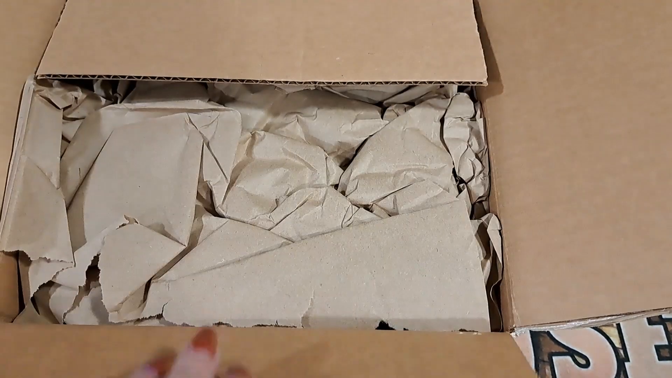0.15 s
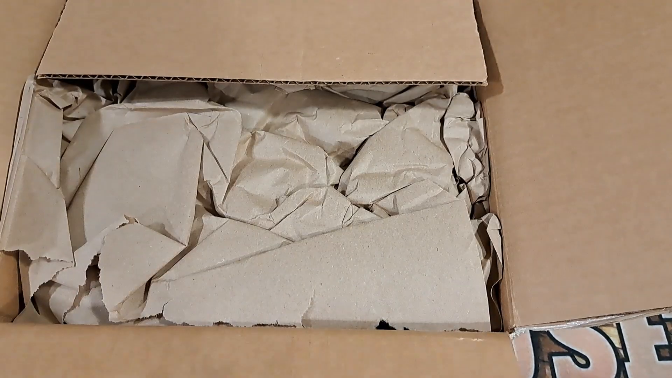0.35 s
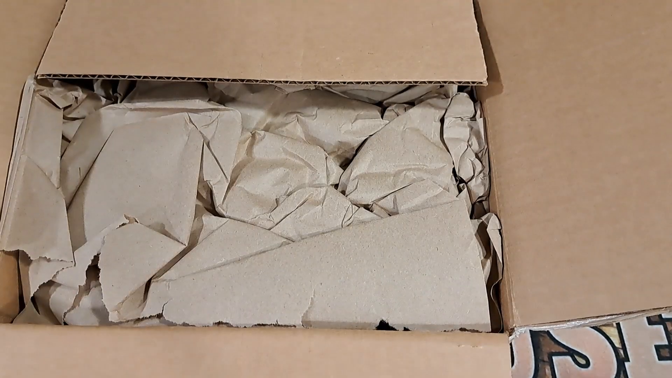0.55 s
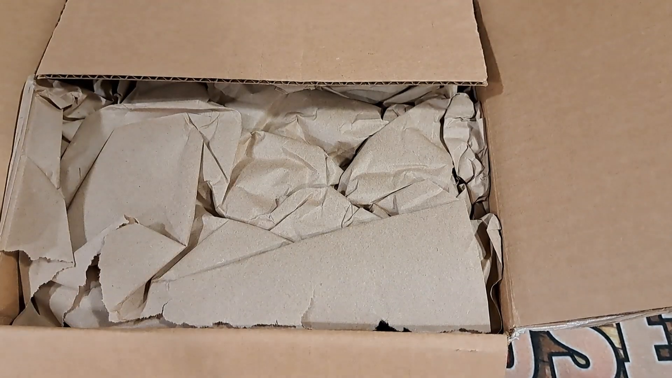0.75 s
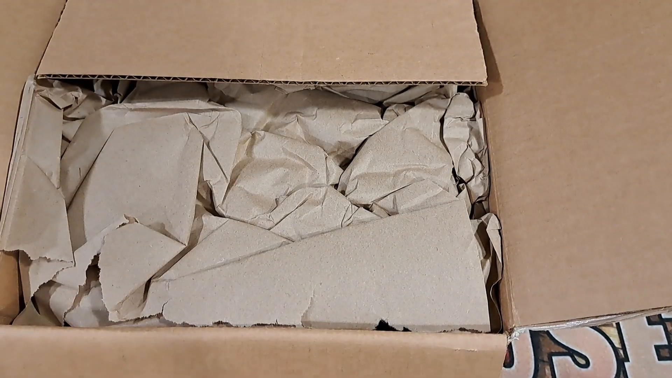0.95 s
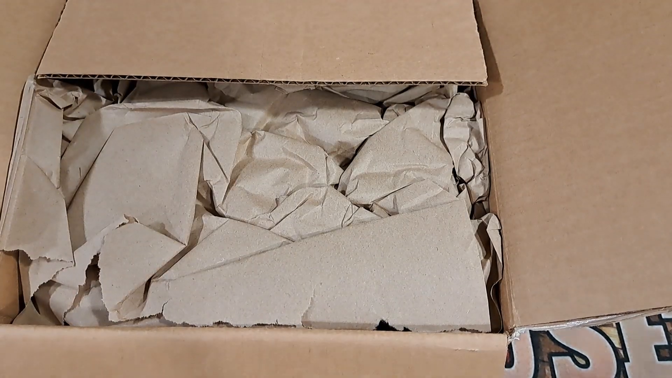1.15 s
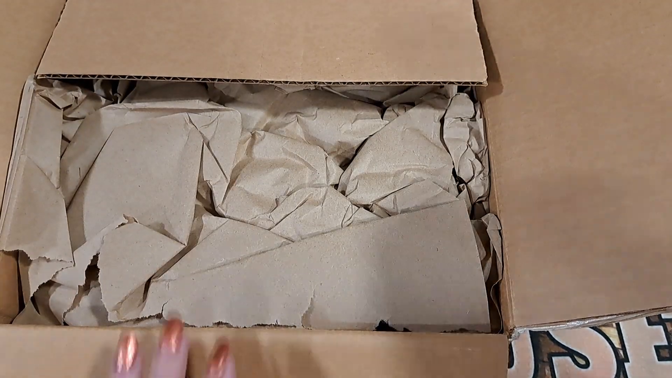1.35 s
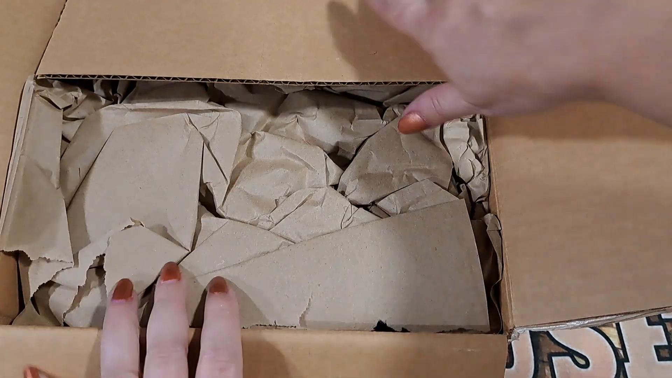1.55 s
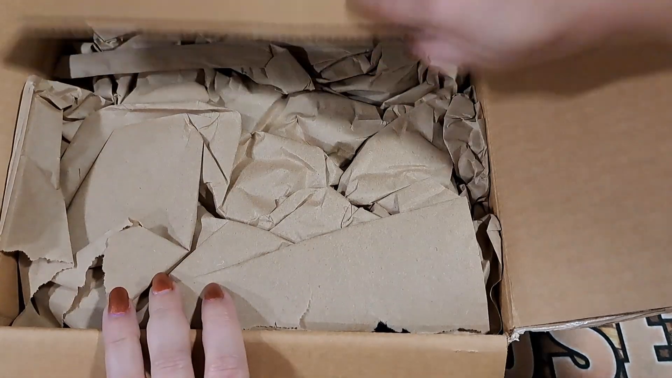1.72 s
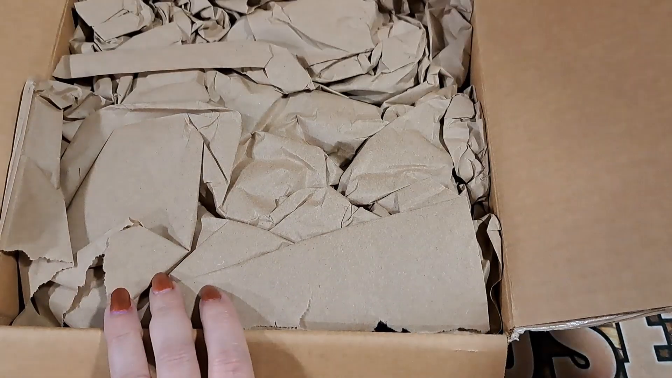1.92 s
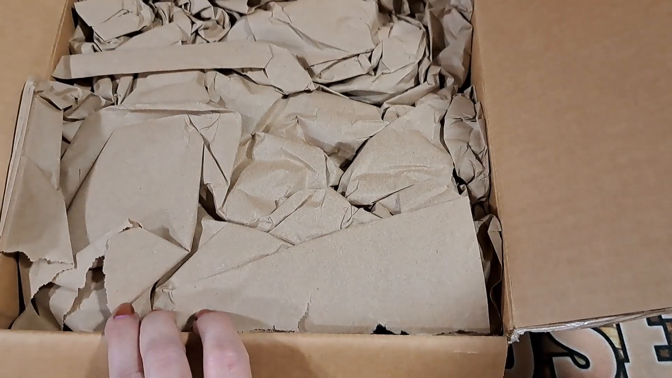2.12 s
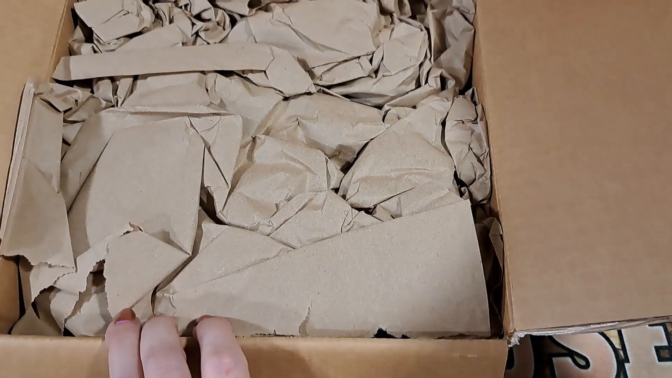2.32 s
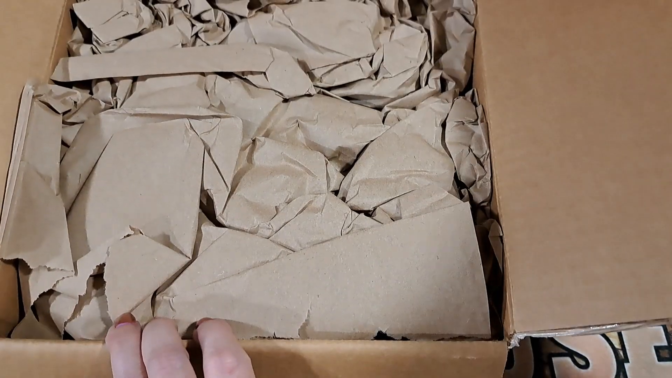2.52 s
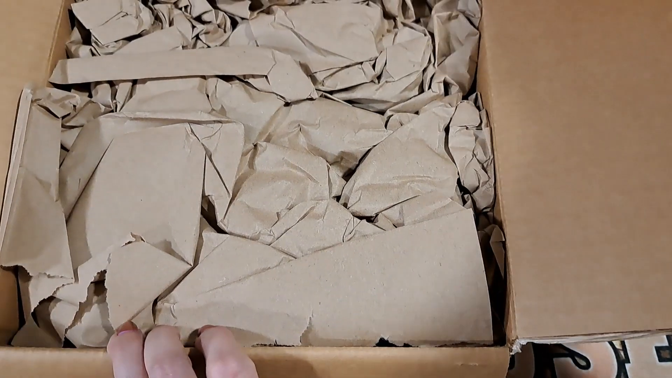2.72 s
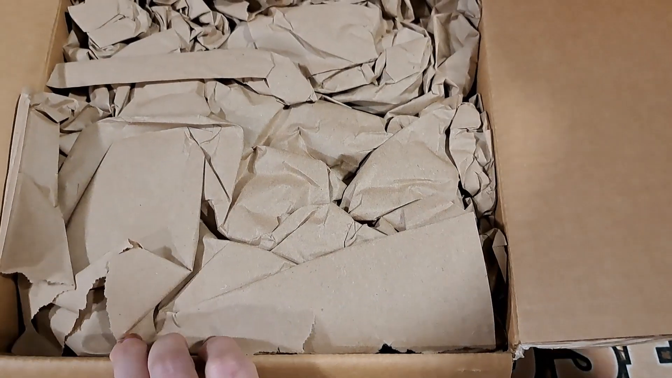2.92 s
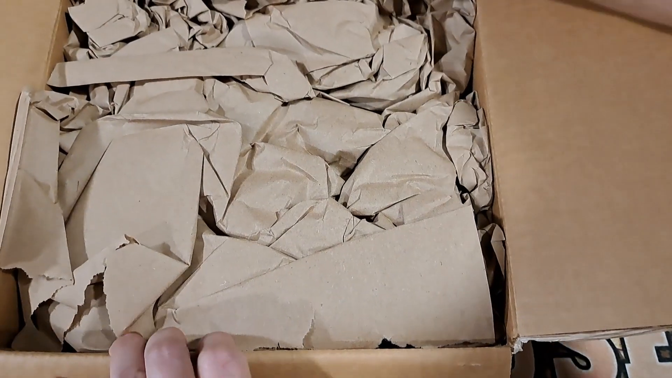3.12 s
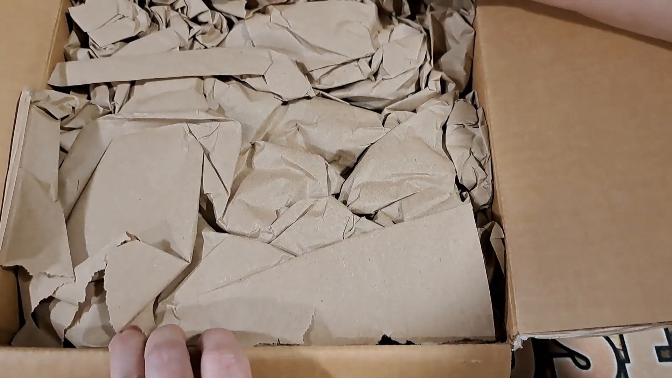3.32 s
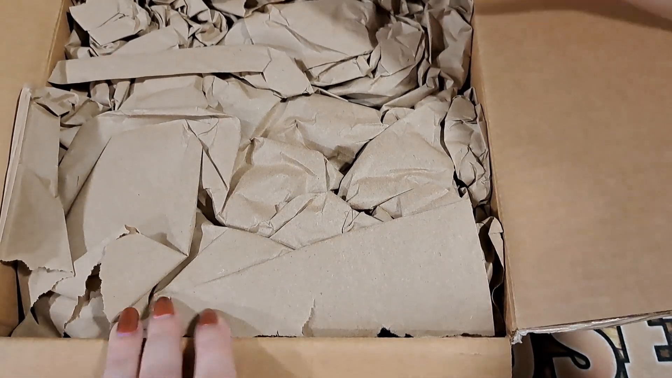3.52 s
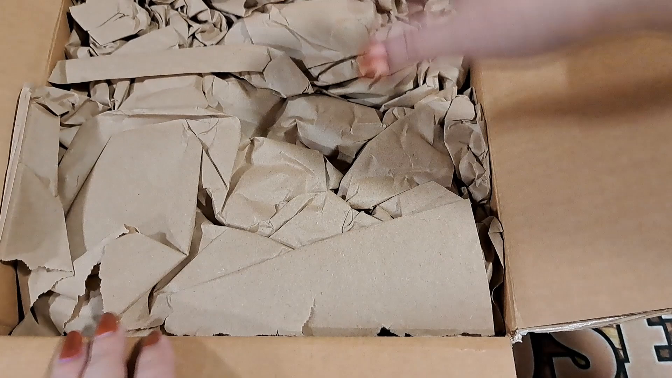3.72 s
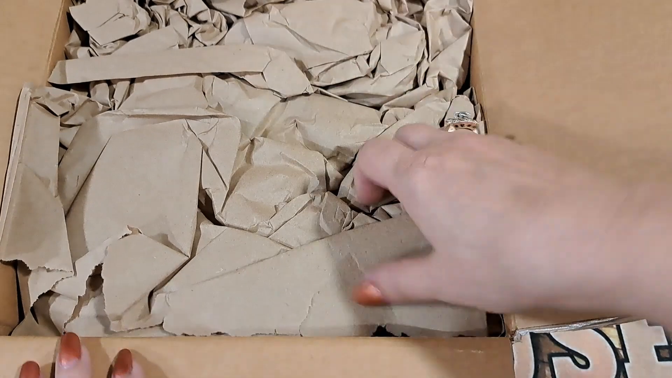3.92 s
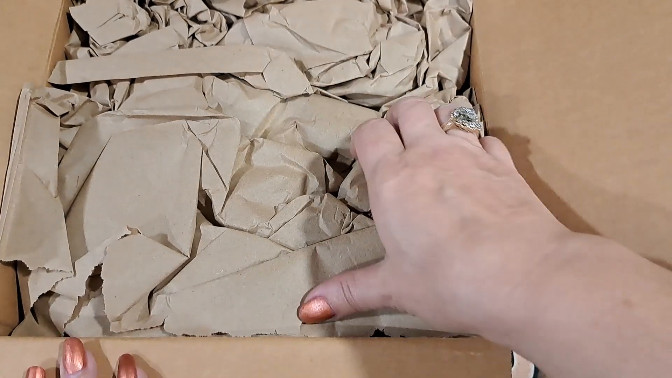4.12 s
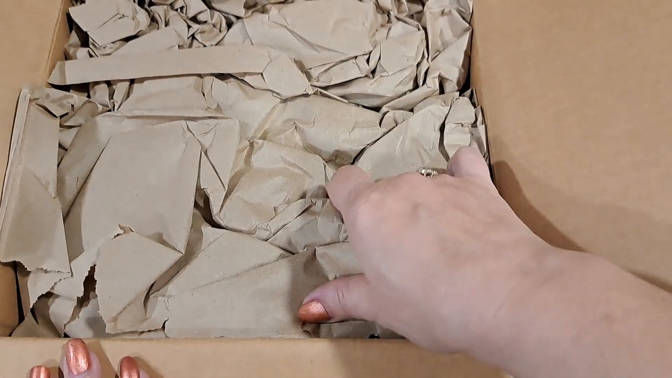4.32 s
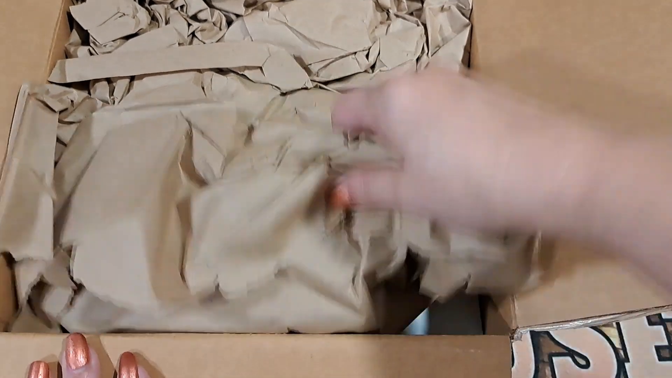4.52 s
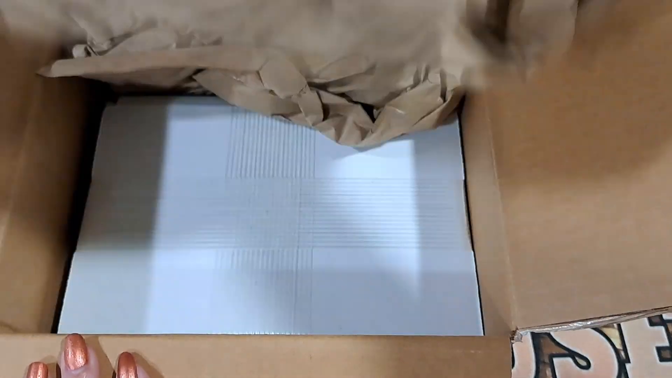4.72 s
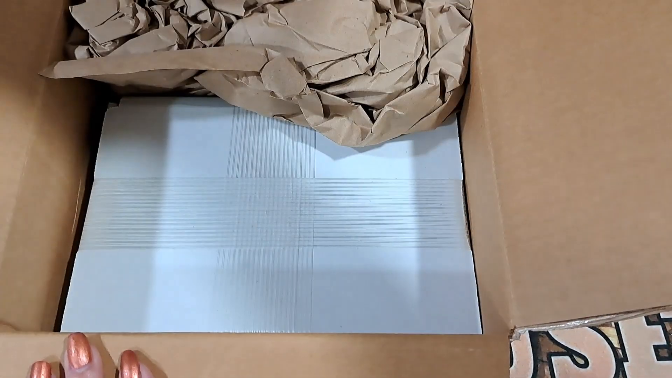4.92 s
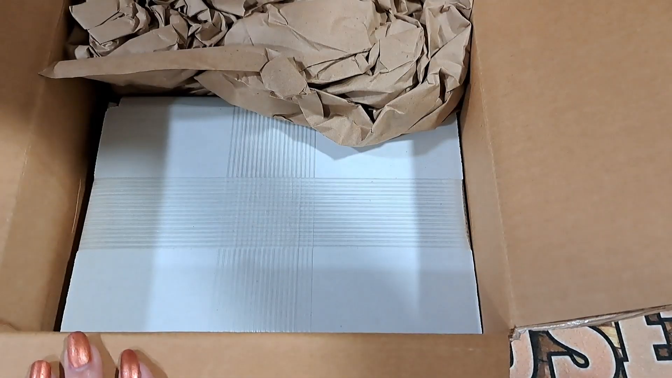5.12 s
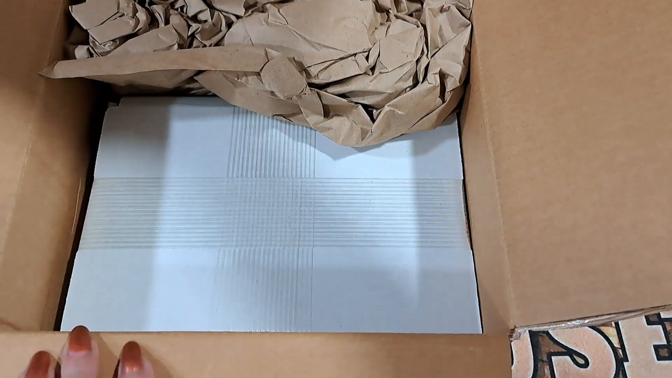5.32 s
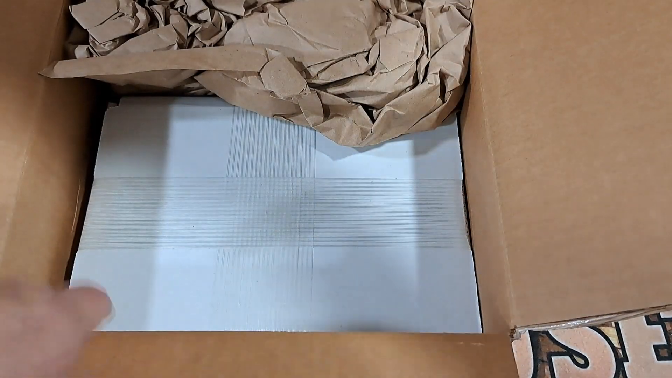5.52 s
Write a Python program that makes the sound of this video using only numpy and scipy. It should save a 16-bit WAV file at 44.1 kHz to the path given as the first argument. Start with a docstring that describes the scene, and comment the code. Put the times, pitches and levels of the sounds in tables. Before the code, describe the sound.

Cardboard box flaps scrape and thump open with tiny jewellery clinks, then crumpled packing paper is dragged out in loud, crackling bursts.

```python
"""Close to a phone in a small, dry room, hands fold back the flaps of a cardboard box: light scrapes and
scuffs at first, while metal jewellery clinks on the moving arm. Then the far flap swings free, its modes
drum under random slips over a coloured crackle, and it ends in a squawk of chatter as the box rocks.
Next, crumpled packing paper is dragged out: crowds of tiny filtered bursts crackle, snap and flop. Last come
faint strokes and scuffs. Near echoes from the box, a short room tail and quiet air lie around it all."""
import sys
import numpy as np
from scipy import signal
from scipy.fft import rfft, irfft, next_fast_len
from scipy.io import wavfile
from scipy.ndimage import uniform_filter1d

SR = 44100
rng = np.random.default_rng(int(sys.argv[2]) if len(sys.argv) > 2 else 0)


def wav_out(sig):
    """Save sig, one row per channel (or a flat mono array), as 16-bit PCM at SR to the path in sys.argv[1]."""
    wavfile.write(sys.argv[1], SR, np.round(np.clip(np.atleast_2d(sig).T, -1, 1) * 32767).astype(np.int16))


N = 249341
T = np.arange(N) / SR  # seconds

# Event and movement levels are relative: each layer has its own gain. Positive left_right_db is louder left.
# the loudest creases and edges that snap: start_s, pop_db, pop_hz, crack_db, left_right_db
SNAPS = [(0.0617, -29.5, 890, -29, 3), (.2507, -62, 4390, -29.5, 3), (0.285, -47.5, 1670, -30, 9.5),
         (0.313, -52, 4480, -30.5, 0), (.465, -49.5, 4290, -42, -3), (.6244, -67, 4390, -42, 7),
         (1.0028, -73, 3270, -43, -1), (1.3767, -29, 816, -46, -4), (1.72, -33.5, 920, -20, -6),
         (1.7514, -19.5, 3180, -16, -5.5), (1.768, -19.5, 4440, -20, -9), (1.8105, -12.5, 1920, -21, 0),
         (1.9614, -27, 3650, -19, -4), (2.11, -26, 3520, -20, -1), (2.1876, -54, 4160, -25.5, -16),
         (2.2032, -30, 4090, -30, -5), (2.2163, -39, 4180, -31, -16.5), (2.383, -17.5, 2260, -11.5, -5),
         (3.2366, -53, 4480, -28, -17.5), (3.5485, -37, 4195, -23, 1.5), (3.7704, -52.5, 3340, -38, -4),
         (3.9517, -28.5, 3420, -23.5, 3), (3.9734, -27, 2030, -22, -5.5), (4.066, -23.5, 3190, -34.5, -3),
         (4.088, -25, 1870, -34.5, 2.5), (4.1269, -22, 2520, -24, -6.5), (4.133, -21, 2000, -16.5, -5),
         (4.1855, -28.5, 4470, -20, -4.5), (4.2144, -23, 4460, -16.5, -10), (4.2735, -8, 2136, -24, -0.5),
         (4.2948, -31, 2280, -13.5, -1.5), (4.3913, -16.5, 2100, -15, -4), (4.4115, -16.5, 2540, -9.5, 1),
         (4.489, -34, 4250, -6, 7.5), (4.5388, -21, 4200, -7, 0.5), (4.68, -16.5, 4390, -10, -8),
         (4.876, -24, 2580, -15, -10), (4.8835, -28.5, 2930, -15.5, 6), (5.1322, -30, 2680, -30.5, -2),
         (5.3366, -39, 2150, -41, 1), (5.5021, -33.5, 2750, -45.5, 0)]
# dull knocks on the box: start_s, level_db, pitch_hz
KNOCKS = [(0.559, -51, 149), (.615, -50, 178), (.905, -53, 423), (1.376, -26, 305), (1.469, -31, 399),
          (1.924, -30, 329), (2.004, -20.5, 265), (2.058, -24.5, 313), (2.28, -30, 520), (2.333, -26, 409),
          (2.387, -7, 390), (2.402, -23.5, 104), (2.882, -25, 380), (3.018, -17.5, 380),
          (3.685, -49.5, 480), (4.27, -15.5, 625), (4.546, -23.5, 245), (4.602, -16, 344), (4.68, -13, 344),
          (4.707, -13, 344), (4.719, -17.5, 400), (4.874, -25, 446), (5.465, -50, 160)]
# the clearest clinks of the jewellery: start_s, level_db, piece (index)
CLINKS = [(.13, -38, 2), (.357, -39, 1), (.42, -44, 2), (.4519, -44, 2), (.8216, -57, 1), (1.0633, -42, 2),
          (1.096, -28.5, 2), (1.2255, -49, 2), (1.325, -43, 2), (1.495, -32, 2), (1.5388, -30, 1),
          (1.627, -29, 1), (1.747, -24, 2), (1.802, -25, 2), (1.887, -33, 2), (1.905, -16.5, 0),
          (1.984, -37, 1), (2.008, -28.5, 0), (2.027, -28.5, 2), (2.309, -32, 0), (2.792, -41, 2),
          (2.8525, -43.5, 2), (3.25, -34, 2), (3.4169, -28, 0), (3.443, -41, 2), (3.615, -41, 2),
          (3.685, -37.5, 0), (3.686, -36.5, 2), (3.716, -42, 2), (4.027, -32.5, 0)]

# modes of each piece of jewellery: nominal pitch_hz, nominal level_db, t60_s
PIECE_MODES = [
    [(7385, 0, .045), (7420, -23, .25), (10850, -18, .1), (12060, -15, .1)],
    [(5680, -6, .11), (9320, 0, .07), (12830, -9, .05), (15170, -15, .06)],
    [(12710, 0, .045), (12860, -14, .12), (13640, -10, .045), (11130, -22, .12), (12350, -11, .04)],
]
# modes of the cardboard panels: pitch_hz, level_db, t60_s
PANEL_MODES = [(60.6, -12.5, 0.15), (143, -5, .07), (218, -4.5, 0.062), (321, 0, 0.042), (376, -2, 0.019),
               (547.5, 3.5, 0.028), (685, 0, 0.029)]
# modes of the far flap: pitch_hz, level_db, t60_s
FAR_FLAP_MODES = [(341.5, -4, 0.093), (416, 1.5, .045), (480, -5, 0.071), (1010, -26.5, 0.09)]
# modes of the near flap, damped by the fingers: pitch_hz, level_db, t60_s
NEAR_FLAP_MODES = [(520, -1, 0.03), (679, 3.5, 0.031), (822, -0.5, 0.031), (1245, -4.5, 0.012),
                   (1680, -4, 0.011), (2015, -4.5, .016), (2800, -10, 0.012)]

# spectrum of rubbed cardboard: frequency_hz, level_db
CARD_COLOUR = [(290, -27), (500, 7), (750, -12), (919, -10.5), (1140, -12), (1640, -15.5), (2160, -17.5),
               (2810, -21), (3060, -21), (3590, -22), (5310, -18), (6060, -18), (11600, -12),
               (15100, -14.5), (16000, -32)]
# spectrum of handled paper: frequency_hz, level_db
PAPER_COLOUR = [(24, -40), (40, -2), (231, 2.5), (337, 1.5), (630, -4.5), (697, -3.5), (751, -4.5),
                (965, -3.5), (1090, -6), (1550, -4), (2260, -8), (4680, -17), (5870, -21), (11600, -21.5),
                (16000, -20.5)]
# spectrum of the room's quiet air: frequency_hz, level_db
AIR_COLOUR = [(18, -28.5), (30, -0.5), (295, -10), (632, -16), (702, -10), (988, -24), (3870, -26.5),
              (7870, -19), (16000, -22.5)]
# spectrum of the chatter's hiss: frequency_hz, level_db
CHATTER_COLOUR = [(1500, -8.5), (3500, -13), (5000, -8.0), (7800, 3.5), (9000, -3.0), (11500, 2.5), (14000, -9.5)]
# spectrum of the rocking rumble: frequency_hz, level_db
ROCK_COLOUR = [(55, 3.5), (70, 4.5), (95, -2.5), (200, -11.5)]
# spectrum of the stray ticks: frequency_hz, level_db
TICK_COLOUR = [(2000, 1.0), (16000, -3.5)]

# how much the two microphones differ: frequency_hz, side_against_mid_db
WIDTH = [(40, -4.5), (70, -6), (130, -12), (300, -17.5), (600, -6.5), (1200, -3.5), (2400, 0.5),
         (5000, 0.5), (16000, 0)]
# the room's decay: frequency_hz, t60_s
ROOM_DECAY = [(100, 0.39), (500, 0.24), (3000, 0.25), (8000, 0.22), (16000, 0.11)]
# echoes from the walls of the box: delay_s, level_db
BOX_ECHOES = [(.0011, -29.5), (.0021, -22), (.0047, -17)]
# where the hands work on the box: time_s, left_right_db
HANDS_SIDE = [(0.7, 2.5), (1.3, 2.5), (1.7, 0), (2.5, -0.5), (3.5, -1), (5.5, 1)]
# how freely the far flap swings while it is rubbed: time_s, share of the drumming's power (0-1)
FLAP_FREE = [(2.25, 0.2), (2.45, 0.97), (2.78, 0.91), (3.16, 0.77), (3.25, 0.14)]

# Each movement builds up before hold_start_s and dies away after the hold.
# strokes of cardboard on cardboard:
# hold_start_s, hold_s, scrape_db, drumming_against_scrape_db, hiss_against_scrape_db
STROKES = [(0, 0.024, -52, -1.5, 1.5), (.09, 0.017, -61, -2, 9), (.15, 0.026, -49.5, -9.5, 3),
           (.225, 0.081, -63.5, 4, 10.5), (.36, 0.11, -70.5, 7.5, 12.5), (.5, 0.043, -64, 5.5, 6),
           (.56, 0.072, -72, 12.5, 12.5), (.68, .02, -74, -4, 13.5), (.845, 0.12, -82, 15, 16.5),
           (1.02, 0.077, -76.5, 12, 11), (1.17, 0.046, -80.5, 5, 8), (1.255, .04, -70.5, 1, 9.5),
           (1.31, 0.058, -54.5, 1, -2), (1.39, 0.074, -50, 4, 2), (1.52, 0.035, -57.5, 6.5, 12),
           (1.595, 0.063, -50, 4, 6.5), (1.735, .045, -37, -1.5, -1.5), (1.82, 0.048, -42.5, 3, 10),
           (1.9, 0.054, -45.5, -1, 3.5), (1.995, 0.063, -43, 6, 1.5), (2.11, 0.025, -40.5, 1.5, -2.5),
           (2.18, 0.21, -51, 8, 1.5), (2.368, 0.02, -34.5, 2.5, 8), (2.455, 0.037, -36, 8.5, 5.5),
           (2.505, 0.051, -30.5, 4, 3), (2.6, 0.062, -31.5, 3, 1.5), (2.655, 0.093, -30.5, 3.5, 0.5),
           (2.905, .05, -34.5, 5.5, -4.5), (3.045, 0.093, -36, 4.5, 5), (3.23, 0.028, -56, 5, 6.5),
           (3.33, 0.13, -74, 10.5, 12.5), (3.45, 0.1, -52.5, 3.5, -2.5), (3.545, 0.039, -49, 5, 1.5),
           (3.7, 0.25, -70, 1.5, 7.5), (5.48, 0.054, -60.5, 1, 2), (5.58, .07, -65, -6, 5.5)]
STROKE_RISE_DB_PER_S, STROKE_FALL_DB_PER_S = 440, 268.5
# the hand squeezes, drags and lets go of the paper:
# hold_start_s, hold_s, crumpling_db, flop_against_crumpling_db, fizz_against_crumpling_db
SQUEEZES = [(3.933, .01, -52, 0, -5), (3.969, 0.024, -38, -2, 1.5), (4.051, 0.076, -34.5, -3.5, -1.5),
            (4.202, .03, -38.5, -1.5, 4.5), (4.27, 0.013, -21.5, -4.5, -3.5), (4.318, .015, -30, -5, 2.5),
            (4.385, .012, -26, -6, 0), (4.446, 0.09, -30, -9, 2), (4.522, 0.027, -21.5, -3.5, 4),
            (4.59, 0.055, -21.5, -4.5, 1), (4.679, 0.072, -24, -2.5, 5), (4.863, 0.0097, -29, -1.5, 0),
            (5.059, 0.1, -54.5, 0, -0.5)]
SQUEEZE_RISE_DB_PER_S, SQUEEZE_FALL_DB_PER_S = 649.5, 159
# once the paper is put down it falls silent faster than in the hand
PUT_DOWN_S, SETTLE_DB_PER_S = 4.85, 402
# fingers scuff along the near flap: hold_start_s, hold_s, level_db
SCUFFS = [(.15, 0.026, -63), (.52, .1, -72), (.91, 0.057, -69), (1.31, .02, -45.5), (1.375, 0.087, -42.5),
          (5.455, 0.047, -62), (5.59, .04, -67)]
SCUFF_RISE_DB_PER_S, SCUFF_FALL_DB_PER_S = 590, 194
# reaches of the arm that set the jewellery jingling: hold_start_s, hold_s, level_db
REACHES = [(1.03, .06, -66), (1.3, 0.18, -55.5), (1.92, 0.18, -56), (3.44, 0.32, -67.5)]
REACH_RISE_DB_PER_S, REACH_FALL_DB_PER_S = 150, 98
# the flap's edge sticks and slips in step with the panel
CHATTER_S, CHATTER_HOLD_S, CHATTER_DB, CHATTER_HISS_DB = 3.132, 0.0054, -13.5, -17
CHATTER_RISE_DB_PER_S, CHATTER_FALL_DB_PER_S = 1898.5, 1298.5
# the whole box rocks on the table
ROCK_S, ROCK_HOLD_S, ROCK_DB = 3.1, 0.052, -42
ROCK_RISE_DB_PER_S, ROCK_FALL_DB_PER_S = 320, 57


def amp(db):
    """Decibels to gain."""
    return 10 ** (np.asarray(db) / 20)


def evened(x):
    """Scales to rms 1."""
    return x / np.sqrt(np.mean(x ** 2) + 1e-20)


def read(points, hz):
    """Reads a table along a log-frequency axis."""
    f, value = np.transpose(points)
    return np.interp(np.log(hz + 1), np.log(f + 1), value)


def pan(db):
    """Left and right gains for a level difference."""
    return amp([[db / 2], [-db / 2]])


def add(mix, s, sound):
    """Adds a stereo sound into the mix at time s."""
    part = mix[:, max(round(s * SR), 0):][:, :sound.shape[1]]
    part += sound[:, :part.shape[1]]


def shaped(x, gain):
    """Filters by a gain given as a function of frequency."""
    size = next_fast_len(x.shape[-1], True)
    spectrum = rfft(x, size) * gain(np.fft.rfftfreq(size, 1 / SR))
    return irfft(spectrum, size)[..., :x.shape[-1]]


def stereo(pair):
    """Two unrelated signals become left and right: more alike in the bass, apart in the treble."""
    side = shaped(pair[1], lambda f: amp(read(WIDTH, f)))
    return np.array([pair[0] + side, pair[0] - side])


def band(x, colour, low_hz, high_hz):
    """One coloured band of x with soft edges, rms 1."""
    def gain(f):
        edges = (1 + (low_hz / (f + 1)) ** 8) * (1 + (f / high_hz) ** 8)
        return amp(read(colour, f)) / np.sqrt(edges)
    return evened(shaped(x, gain))


def noise():
    """Two unrelated channels of white noise."""
    return rng.standard_normal((2, N))


def swell(start, hold, rise, fall):
    """The level in dB of one movement: it builds up, holds at 0 and dies away (dB per second)."""
    before, after = np.maximum(start - T, 0), np.maximum(T - start - hold, 0)
    return -abs(rise) * before - abs(fall) * after


def movements(rows, rise, fall):
    """Gain curves of a run of movements: the main layer first, then the layers set against it."""
    level_db = np.full((len(rows[0]) - 2, N), -140.)
    for start, hold, db, *against in rows:
        layers_db = db + np.array([0, *against])[:, None]
        level_db = np.maximum(level_db, swell(start, hold, rise, fall) + layers_db)
    return amp(level_db)


def rubbing():
    """Strength of scrape, drumming and hiss as the flaps are pushed."""
    return movements(STROKES, STROKE_RISE_DB_PER_S, STROKE_FALL_DB_PER_S)


def crumpling():
    """Strength of crumpling, flop and fizz: paper dies away slowly in the hand, fast once put down."""
    held = [row for row in SQUEEZES if row[0] < PUT_DOWN_S]
    loose = [row for row in SQUEEZES if row[0] >= PUT_DOWN_S]
    in_hand = movements(held, SQUEEZE_RISE_DB_PER_S, SQUEEZE_FALL_DB_PER_S)
    in_hand = in_hand * amp(swell(0, PUT_DOWN_S, 0, SETTLE_DB_PER_S))
    return np.maximum(in_hand, movements(loose, SQUEEZE_RISE_DB_PER_S, SETTLE_DB_PER_S))


def burst(hz, t60, q):
    """A pair of unrelated noise cracks that die quickly, in a broad hump about hz."""
    t = np.arange(2048) / SR
    hz = min(hz, SR / 3)
    hump = signal.iirpeak(hz, max(q, 3 * hz / SR), SR)
    return signal.lfilter(*hump, rng.standard_normal((2, len(t))) * amp(-60 * t / t60))


def clicks(per_s, spread_db):
    """Random clicks of either sign, most of them small, a few large."""
    train, count = np.zeros(N), int(per_s * N / SR)
    at, size, sign = rng.random((count, 3)).T
    excess = np.minimum(-np.log(1 - size), 4)
    train[(at * N).astype(int)] = np.sign(sign - .5) * amp(spread_db * excess)
    return train


def crackle(per_s, spread_db, t60, q, smooth_db, count=16):
    """Tiny buckles in facets of many pitches, over the smooth hiss of sliding fibres."""
    out = np.zeros((2, N))
    for hz in np.geomspace(400, 14000, count):
        buckles = clicks(per_s / count, spread_db)[None]
        out += signal.oaconvolve(buckles, burst(hz, t60, q), axes=1)[:, :N]
    return stereo(evened(out) + amp(smooth_db) * noise())


def flexing(x, depth_db, size=(14, 3)):
    """Resonances come and go in random patches as the sheets bend, less deeply towards the treble."""
    hz, t, z = signal.stft(x, SR, nperseg=512, noverlap=384)
    patches = uniform_filter1d(rng.standard_normal(z.shape[1:]), size[0], 1)  # smooth in time
    patches = evened(uniform_filter1d(patches, size[1], 0))  # smooth in frequency
    bent = z * amp(depth_db * patches / (1 + hz[:, None] / 9000))
    return signal.istft(bent, SR, nperseg=512, noverlap=384)[1][:, :N]


def ring(modes):
    """The answer of a piece of cardboard to one sharp tap: decaying sines, a quarter turn apart."""
    t = np.arange(SR // 4) / SR
    return sum(amp(db - 60 * t / t60) * np.sin(2 * np.pi * hz * t + k * np.pi / 2)
               for k, (hz, db, t60) in enumerate(modes))


def drumming(modes, per_s, spread_db, low_hz, high_hz):
    """Uneven slips keep the modes ringing."""
    slips = np.array([clicks(per_s, spread_db) for _ in range(2)])
    rung = stereo(signal.oaconvolve(slips, ring(modes)[None], axes=1)[:, :N])
    return band(rung, [(1, 0)], low_hz, high_hz)  # a flat colour


def quiet_air():
    """The quiet air of the room: steady coloured noise."""
    return amp(-74.5) * band(stereo(noise()), AIR_COLOUR, 25, 20000)


def room(x):
    """A short diffuse tail from the walls of a small room: noise that decays at its own rate by frequency."""
    taps = rng.standard_normal((2, SR // 2)) * (T[:SR // 2] > .005)
    hz, t, z = signal.stft(taps, SR, nperseg=256)
    decay = amp(-60 * t / read(ROOM_DECAY, hz)[:, None])
    tail = signal.istft(z * decay, SR, nperseg=256)[1]
    wet = signal.fftconvolve(x, tail / np.linalg.norm(tail[0]), axes=1)[:, :N]
    return stereo(wet) / np.sqrt(2)


def in_box(x):
    """The box walls add close echoes."""
    out = x.copy()
    for delay, db in BOX_ECHOES:
        add(out, delay, amp(db) * x)
    return amp(-1.5) * out


def at_hands(x):
    """The rubbing drifts between left and right with the hands."""
    side_db = np.interp(T, *np.transpose(HANDS_SIDE))
    return x * amp(np.array([side_db, -side_db]) / 2)


def rocking():
    """A low rumble of noise as the box shifts."""
    level = amp(ROCK_DB + swell(ROCK_S, ROCK_HOLD_S, ROCK_RISE_DB_PER_S, ROCK_FALL_DB_PER_S))
    return level * band(stereo(noise()), ROCK_COLOUR, 42, 170)


def clink(piece, tick_db=-8):
    """The tick of contact and the ring of one small metal piece; the touch sets each mode's strength."""
    t = np.arange(SR // 3) / SR
    out = np.zeros((2, len(t)))
    for hz, db, t60 in PIECE_MODES[piece]:
        # the main mode varies least
        strength_db = (1.5 if db == 0 else 4) * rng.standard_normal((2, 1))
        turns = hz * (1 + .004 * rng.standard_normal()) * t + .4 * rng.random((2, 1))
        out += amp(db + strength_db - 60 * t / t60) * np.sin(2 * np.pi * turns)
    add(out, 0, amp(tick_db) * burst(13000, 0.029, q=2.3))
    return out * (1 - np.exp(-t / 0.00011))  # soft onset


def jingles(touch_db=5, spread_db=4, count=40):
    """Faint chance touches of the jewellery while the arm reaches."""
    out = np.zeros((2, N))
    arm = movements(REACHES, REACH_RISE_DB_PER_S, REACH_FALL_DB_PER_S)[0]
    for k, (when, size, which) in enumerate(rng.random((count, 3))):
        at = int((k + when) / count * N)
        strength = arm[at] * amp(touch_db + spread_db * (2 * size + 1))
        add(out, at / SR, strength * clink(0 if which < .5 else 2))
    return out


def jewellery(rebound_db=-23, count=2):
    """After each touch the pieces swing and brush each other a little more; one trembles in the reaches."""
    out = np.zeros((2, N))
    for s, db, piece in CLINKS:
        add(out, s, amp(db) * clink(piece))
        for k, gap in enumerate(np.cumsum(rng.uniform(.008, .035, count))):
            add(out, s + gap, amp(db + rebound_db - 2.2 * k) * clink(piece))
    brushes = clicks(per_s=60, spread_db=3)
    shimmer = evened(signal.oaconvolve(brushes[None], clink(0), axes=1)[:, :N])
    arm = movements(REACHES, REACH_RISE_DB_PER_S, REACH_FALL_DB_PER_S)
    return amp(-3.5) * out + amp(-1.0) * arm * shimmer


def scuffs():
    """Skin catches and slips on the near flap, which answers with a hollow rasp."""
    rasp = drumming(NEAR_FLAP_MODES, per_s=340, spread_db=3.5, low_hz=428, high_hz=3330)
    return movements(SCUFFS, SCUFF_RISE_DB_PER_S, SCUFF_FALL_DB_PER_S) * rasp * pan(-0.89)


def stray_ticks(per_s=45):
    """Now and then one crease or ridge lets go and stands out of the hiss."""
    ticks = flexing(crackle(per_s, spread_db=2, t60=.008, q=1., smooth_db=-40), depth_db=3)
    drive = amp(-10) * rubbing()[2] + amp(-11) * crumpling()[0]  # card hiss and crumpling
    return drive * band(ticks, TICK_COLOUR, 1200, 20000)


def knocks(ring_db=-11, cycles=1.):
    """A soft, short push at the knock's pitch, which also sets the panels ringing."""
    out, t, panels = np.zeros((2, N)), np.arange(SR // 4) / SR, ring(PANEL_MODES)
    for s, db, hz in KNOCKS:
        age = 2 * hz * t / cycles  # the push is fullest at age 1
        push = age * np.exp(1 - age) * np.sin(2 * np.pi * hz * t)
        body = signal.fftconvolve(push, panels)[:len(t)]
        knock = push + amp(ring_db) * body / abs(body).max()
        add(out, s, amp(db) * knock * pan(-2.3))
    return amp(0.5) * out


def snaps(crack_s=0.0097, crack_hz=8000, pop_s=0.026, pop_q=2.6, rise_s=0.00035):
    """A sharp crack and the short pop of the facet that buckled (crack_s and pop_s are t60)."""
    out = np.zeros((2, N))
    for s, pop_db, hz, crack_db, side_db in SNAPS:
        pop = stereo(burst(hz, pop_s, pop_q))
        crack = stereo(burst(crack_hz, crack_s, q=0.95))
        snap = amp(pop_db) * pop / abs(pop).max() + amp(crack_db) * crack / abs(crack).max()
        onset = 1 - np.exp(-T[:snap.shape[1]] / rise_s)
        add(out, s, snap * onset * pan(side_db))
    return amp(3.5) * out


def paper():
    """Whole sheets flop, creases buckle in crowds, and the fibres fizz."""
    crumple, flop, fizz = crumpling()
    sheets = crackle(per_s=900, spread_db=4.0, t60=0.014, q=0.32, smooth_db=-15.0)
    creases = flexing(crackle(per_s=1100, spread_db=3.3, t60=.011, q=2.2, smooth_db=-7), depth_db=2.5)
    fibres = flexing(crackle(per_s=2100, spread_db=2, t60=.012, q=1.5, smooth_db=-1.5), depth_db=3.0)
    return (amp(-1.0) * flop * band(sheets, PAPER_COLOUR, 92, 750) * pan(-1)
            + crumple * band(creases, PAPER_COLOUR, 840, 5800) * pan(-1)
            + amp(-3.0) * fizz * band(fibres, PAPER_COLOUR, 4120, 18000) * pan(-.5))


def chatter(hz=478, gate=0.42):
    """The flap squawks for a few cycles, with a spurt of hiss on every slip."""
    level_db = swell(CHATTER_S, CHATTER_HOLD_S, CHATTER_RISE_DB_PER_S, CHATTER_FALL_DB_PER_S)
    level_db = np.maximum(level_db, -140)
    swing, hiss = amp(CHATTER_DB + level_db), amp(CHATTER_HISS_DB + level_db)
    wave = np.sin(2 * np.pi * hz * T)
    rasp = band(stereo(noise()), CHATTER_COLOUR, 900, 16000)
    return np.sqrt(2) * swing * wave * pan(-5) + hiss * rasp * (1 + gate * wave)


def cardboard(slip_hiss=0.099):
    """Slips drum on the box or on its loose flap while the rough surface scrapes and hisses."""
    scrape, drum, hiss = rubbing()
    free = np.clip(np.interp(T, *np.transpose(FLAP_FREE)), 0, 1)
    walls = drumming(PANEL_MODES, per_s=660, spread_db=5.0, low_hz=42, high_hz=840)
    flap = drumming(FAR_FLAP_MODES, per_s=350, spread_db=4.0, low_hz=218, high_hz=750)
    panel = np.sqrt(1 - free) * walls + np.sqrt(free) * flap
    grain = crackle(per_s=3500, spread_db=3.0, t60=0.012, q=0.86, smooth_db=2.5)
    grain = flexing(grain, depth_db=3)
    grain = grain * (1 + slip_hiss * panel[0])  # swells as the panel swings one way, thins on the other
    return (amp(1) * drum * panel * pan(-2.5)
            + amp(-1) * scrape * band(grain, CARD_COLOUR, 900, 4500) * pan(-0.084)
            + amp(-1.5) * hiss * band(grain, CARD_COLOUR, 3500, 20000) * pan(-1.9))


def scene():
    """Everything close to the microphones, its echo in the room, and the quiet air."""
    boxed = in_box(at_hands(cardboard()) + paper() + snaps() + stray_ticks())
    near = boxed + scuffs() + chatter() + knocks() + rocking() + jewellery() + jingles()
    return near + amp(-12.5) * room(near) + quiet_air()


def record(dry, edge_hz=15950):
    """The recorder's band limit: a steep low-pass."""
    low_pass = signal.firwin(511, edge_hz, window=("kaiser", 9), fs=SR)
    return signal.oaconvolve(dry, low_pass[None], "same")


dry = scene()
out = record(dry)
wav_out(out)
```